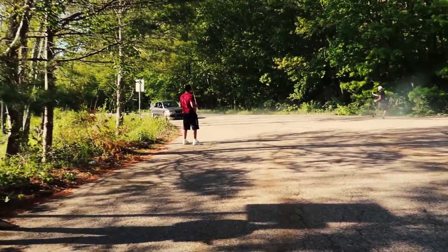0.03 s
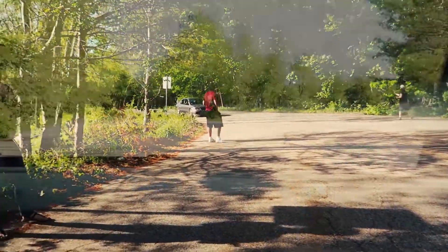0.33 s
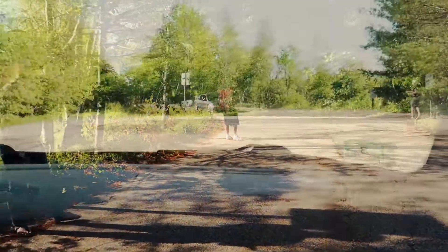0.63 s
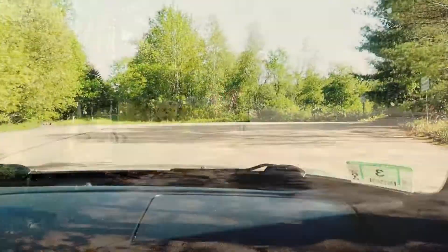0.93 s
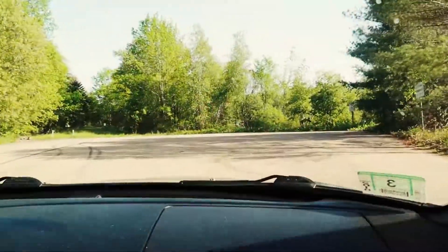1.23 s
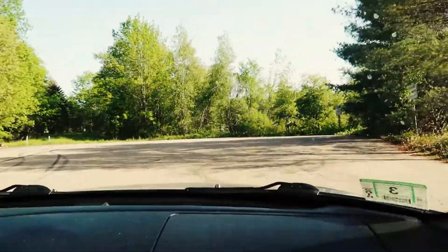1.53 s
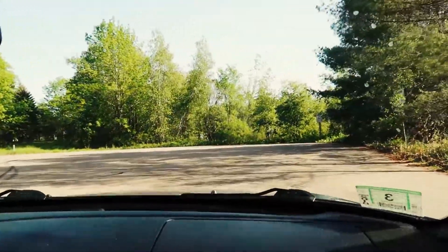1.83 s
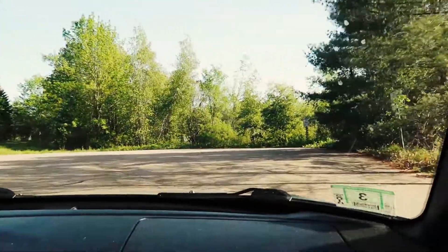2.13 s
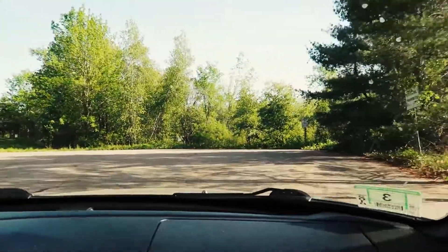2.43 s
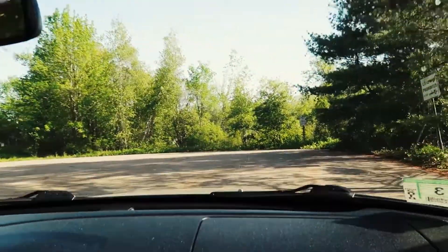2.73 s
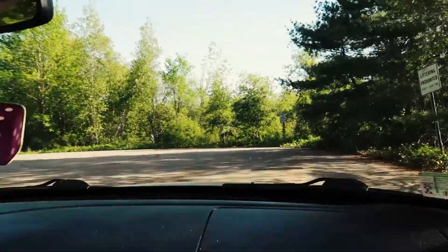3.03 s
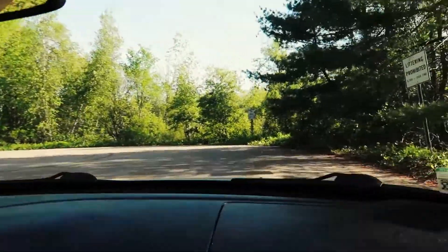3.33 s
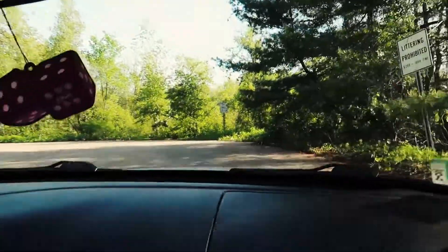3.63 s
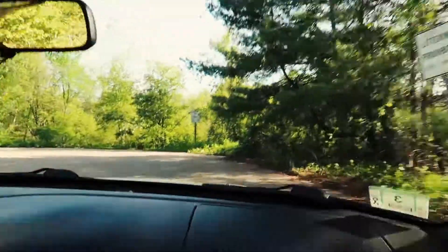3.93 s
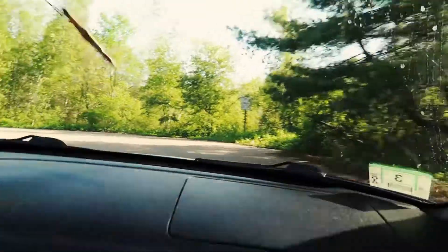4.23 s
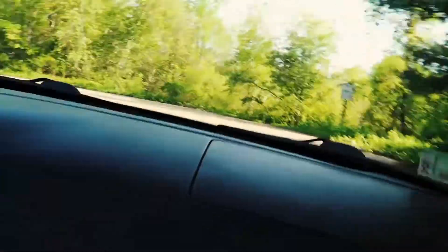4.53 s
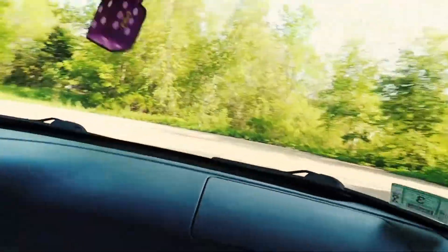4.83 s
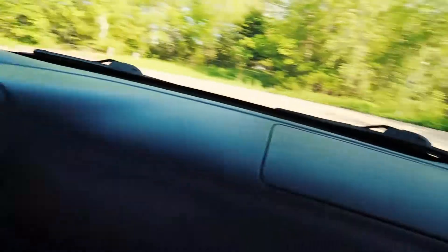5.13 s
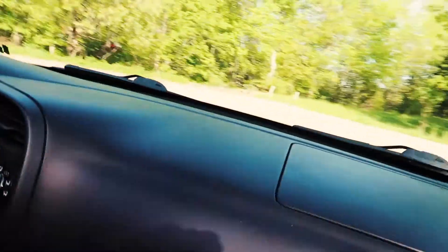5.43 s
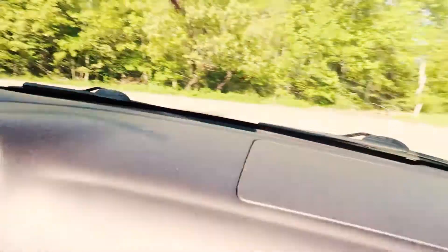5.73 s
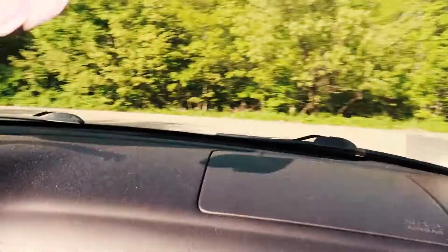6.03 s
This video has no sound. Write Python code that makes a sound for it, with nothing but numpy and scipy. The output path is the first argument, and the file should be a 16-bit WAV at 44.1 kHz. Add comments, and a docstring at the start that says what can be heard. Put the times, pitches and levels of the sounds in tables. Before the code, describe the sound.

Inside a car, the engine hums and climbs, then roars in bursts as the tyres chirp, spray grit and screech around a turn.

```python
"""A four-cylinder car rasps past the roadside for a moment as stones tick off its body.
An abrupt cut leads to the cabin: the steering pump whines, and the exhaust booms through the air modes
as the car gathers speed. Loose trim clicks and something knocks. The throttle opens, firing pulses
make the intake roar, a wheel chirps and hops, then the tyres spin up and spray grit. Last, the car
slides through a turn, its tyres squealing by stick-slip friction, while the driver pumps the throttle."""
import sys
import numpy as np
from scipy import signal
from scipy.fft import rfft, irfft, next_fast_len
from scipy.io import wavfile
from scipy.ndimage import uniform_filter1d, minimum_filter1d

SR = 44100
rng = np.random.default_rng(int(sys.argv[2]) if len(sys.argv) > 2 else 0)


def master_out(mix):
    """Clip the mix to full scale and print it as 16-bit PCM to the path in sys.argv[1]."""
    frames = np.transpose(np.atleast_2d(mix))
    ceiling = np.clip(frames, -1, 1)
    pcm = np.round(ceiling * 32767).astype(np.int16)
    wavfile.write(sys.argv[1], SR, pcm)


N = 267687
T = np.arange(N) / SR
CUT_S, LAUNCH_S, SLIDE_S = .195, 3.4, 5.2  # start of the cabin, of hard driving, of the free slide
OVERRUN_FROM_S = 4.4  # from here on, the boom drops whenever the pedal is up
PRESS_S, LIFT_S = .036, .029  # how fast the throttle opens and shuts

# the four cylinders: (strength [dB per dB of unevenness], delay [s per 2 dB of unevenness])
CYLINDERS = [(1.5, 0), (0.14, .00007), (-1.5, -.00005), (0.9, .00002)]
# response of the exhaust in the open: (frequency [Hz], relative gain [dB])
ROADSIDE_RESPONSE = [(40, -20), (110, -19), (157, 9.5), (220, -31), (320, -8), (450, -17.5), (620, 3),
                     (700, 1.5), (800, -3.5), (920, -3), (1100, -18.5), (2000, -26), (5000, -45)]
# rasp of the exhaust at the roadside: (time [s], level [dB])
ROADSIDE_LEVEL = [(0, -17.5), (.05, -23.5), (.09, -23), (.15, -27), (.195, -18)]
# hiss of tyres and engine in the open: (frequency [Hz], relative gain [dB])
HISS_SPECTRUM = [(200, 5), (900, 10), (1500, -3), (2800, -6.5), (5000, -25), (9000, -37)]
# stones striking the body: (time [s], peak level [dB], decay [s])
STONE_HITS = [(.013, -30, 0.006), (.039, -27, 0.0021), (.168, -42.5, 0.024), (3.727, -36.5, .002),
              (3.748, -36.5, 0.0027), (3.767, -36, .002), (3.788, -35.5, .002), (3.882, -45, 0.0017),
              (4.377, -39, 0.0015), (5.286, -37, .002)]
# response of the body to a stone: (frequency [Hz], relative gain [dB])
STONE_RESPONSE = [(600, -5.5), (1500, 5.5), (5000, -2), (8000, -14.5), (12000, -26)]
# a gentle pull, a flare, a bog as the tyres bite, wheelspin, a lift: (time [s], firing rate [Hz])
FIRING_RATE = [(.2, 38.5), (.3, 39.14), (.36, 46.03), (.57, 49.09), (.72, 52.57), (1.26, 60.69),
               (1.98, 73.86), (2.28, 78.15), (3.38, 89.15), (3.47, 98.95), (3.55, 115.3), (3.62, 139.4),
               (3.67, 147.8), (3.9, 119.5), (4.01, 113.4), (4.2, 136.6), (4.46, 146.1), (4.52, 157.5),
               (4.65, 200.9), (5.04, 202), (5.11, 177.6), (5.27, 165.8)]
# stabs of the throttle: (time [s], hold [s], intake level [dB], grit level [dB])
THROTTLE_STABS = [(3.494, 0.069, -16.5, -73.5), (3.86, 0.23, -22, -57), (4.236, 0.22, -27.5, -69.5),
                  (4.494, .525, -19, -26), (5.275, 0.11, -15, -34.5), (5.595, 0.15, -17, -39.5),
                  (5.933, .15, -16.5, -52)]
# exhaust harmonics 1 to 3, ahead of the cabin's response: (level [dB])
EXHAUST_HARMONICS = [1, -4.5, -11]
# air modes of the cabin: (frequency [Hz], gain [dB])
CABIN_MODES = [(39, -16.5), (46, -11), (49, -16.5), (53, -17), (65, -11.5), (79, -16.5), (88, -11),
               (100, -10.5), (120, -10.5), (138, -10.5), (157, -3.5), (168, -7.5), (176, -15), (184, -21),
               (203, -16), (220, -11.5), (240, -23), (270, -29.5)]
# the clutch loads or frees the engine: (time [s], hold [s], change of the boom [dB])
CLUTCH_LOADS = [(.16, 0.3, 5.5), (.5, 0.097, -3.5), (3.41, 0.16, 5.5)]
# intake through the bulkhead at middling revs: (frequency [Hz], relative gain [dB])
GROWL_RESPONSE = [(40, -24), (100, -9.5), (150, -9), (240, -1), (340, 1), (450, -1.5), (570, 2), (690, 3),
                  (800, -6), (930, -18.5), (1170, -11.5), (1450, -32), (2000, -27), (5000, -56.5)]
# the same at high revs: (frequency [Hz], relative gain [dB])
BLARE_RESPONSE = [(40, -39), (100, -15), (150, 6.5), (260, -25), (350, 1), (450, -1.5), (590, 2.5),
                  (730, 9), (820, 0.5), (930, -16.5), (1180, -8), (1400, -25), (1800, -22), (5000, -50.5)]
# resonances of the cabin panels: (frequency [Hz], relative gain [dB])
PANEL_RESPONSE = [(240, -21), (330, 0.5), (365, 17), (420, -3.5), (470, -11.5), (520, 7.5), (600, -4),
                  (650, 5.5), (720, -17), (800, 3.5), (900, -14.5), (1170, -17), (1700, -33), (4000, -35)]
# colour of the mechanical rush: (frequency [Hz], relative gain [dB])
RUSH_SPECTRUM = [(120, -15.5), (250, 0), (450, 4.5), (800, -4.5), (1050, -4.5), (1400, -7.5), (1700, -12),
                 (2200, -14.5), (3200, -23.5), (5000, -30.5), (8000, -38.5), (12000, -43.5)]
# strength of the mechanical rush: (time [s], level [dB])
RUSH_LEVEL = [(.2, -37), (.6, -43), (1.4, -38.5), (2.8, -39), (3.32, -35), (3.52, -39.5), (4.08, -34.5),
              (4.28, -37), (5.05, -30.5), (6.07, -47)]
# low rumble through the body: (frequency [Hz], relative gain [dB])
RUMBLE_RESPONSE = [(20, -29), (35, -16.5), (52, -2), (80, -8.5), (120, -7), (170, -9.5), (260, -20),
                   (450, -42)]
# swells of low rumble, first as the engine lugs, then as the body shakes:
# (peak time [s], level [dB], rise [s], decay [s])
RUMBLE_SWELLS = [(.2, -19.5, .01, 0.15), (3.4, -19.5, 0.73, .1), (4.7, -23.5, .15, 0.55),
                 (5.061, -18.5, 0.022, 0.062)]
# loose trim clicking: (time [s], peak level [dB], decay [s])
TRIM_HITS = [(2.529, -25.5, 0.0052), (2.543, -29, .003), (2.588, -23.5, 0.0036), (2.597, -32, 0.0053),
             (2.682, -29, 0.011), (3.538, -23.5, 0.0076), (3.548, -40, .004), (3.572, -36, .004)]
# response of the trim: (frequency [Hz], relative gain [dB])
TRIM_RESPONSE = [(300, -30.5), (800, 10.5), (1400, 9.5), (2200, -7), (3800, -17), (5000, -32), (9000, -34)]
# something loose knocking in the cabin: (time [s], peak level [dB], decay [s])
KNOCK_HITS = [(3.241, -16.5, 0.0083), (3.266, -19, 0.0087)]
# response to those knocks: (frequency [Hz], relative gain [dB])
KNOCK_RESPONSE = [(100, -19), (165, 18.5), (300, -4.5), (550, 0.5), (1300, -4), (2200, -34), (6000, -46.5)]
# grit against the wheel arches: (frequency [Hz], relative gain [dB])
GRIT_SPECTRUM = [(500, -16), (1200, 8), (1750, 0), (2100, 5.5), (3000, 0.5), (4000, -2), (5500, -4.5),
                 (6500, -9.5), (9000, -12), (11000, -11.5), (12500, -26)]
# tyre squeals: (time [s], hold [s], release [s], starting slip rate [Hz], glide [Hz/s],
# starting level [dB], growth [dB/s], overtone [dB], roughness [fraction of slip rate])
SQUEALS = [(3.67, .15, .08, 1031, -150, -31, -1, -13, .06),
           (4.599, 0.17, .15, 1145, 61.5, -32, -3, -28.5, .04),
           (4.621, 1.7, .05, 781, 25.5, -31, 3.5, -15, .035), (5.078, 1, .05, 1384, -49, -37, 9, -31, .035),
           (5.73, 0.12, 0.031, 852, 3, -27, -1, -29.5, .015)]
# rubber scrubbing sideways over asphalt: (frequency [Hz], relative gain [dB])
SCRUB_SPECTRUM = [(300, -10.5), (550, -12.5), (830, 3.5), (1050, -4.5), (1350, -6), (1580, -11.5),
                  (1780, -18), (2150, -11.5), (2900, -22.5), (4500, -38)]


def undb(db):
    """Decibels to amplitude ratio."""
    return 10 ** (np.asarray(db) / 20)


def curve(rows):
    """Linear interpolation of (time [s], value) rows."""
    return np.interp(T, *np.transpose(rows))


def unit(x):
    """Normalisation to rms 1."""
    return x / np.sqrt(np.mean(x ** 2))


def steady(x, size=SR // 16):
    """Normalisation of the running rms to 1."""
    return x / np.sqrt(uniform_filter1d(uniform_filter1d(x ** 2, size), size) + 1e-12)


def walk(rate_hz, size=16384):
    """Interpolated random fluctuation with a spread near 1."""
    return np.sqrt(3 / 2) * np.interp(T * rate_hz, np.arange(size), rng.standard_normal(size))


def until(end_s, fade_s):
    """Unity up to end_s, then exponential decay."""
    return np.exp(-(T - end_s).clip(0) / fade_s)


def envelope(start_s, held_s, attack_s, release_s):
    """Linear attack, then exponential decay from held_s after the start."""
    return np.clip((T - start_s) / attack_s, 0, 1) * until(start_s + held_s, release_s)


def with_revs(hz, db, db_per_octave):
    """Power law of gain against firing rate; db holds at 100 Hz."""
    return undb(db + db_per_octave * np.log2(hz / 100))


def pan(right_db):
    """A level difference between the channels places a source to the right."""
    return undb(np.array([[-1], [1]]) * right_db / 2)


def noise(spread):
    """Partly coherent stereo noise: a shared direct part plus unrelated reflections."""
    direct, *reflected = rng.standard_normal((3, N))
    return (direct + spread * np.array(reflected)) / np.hypot(1, spread)


def colour(x, response, size=8192):
    """Minimum-phase filtering: x rings a body of the given response and unit power gain."""
    hz, db = np.transpose(response)
    bins = np.maximum(np.arange(size // 2 + 1) * SR / size, 1)
    octaves_outside = np.log2(np.maximum(hz[0] / bins, bins / hz[-1]).clip(1))
    gain_db = np.interp(np.log(bins), np.log(hz), db) - 20 * octaves_outside
    cepstrum = irfft(np.log(undb(gain_db)))
    cepstrum[1:size // 2] *= 2  # folding the cepstrum makes the response causal
    cepstrum[size // 2 + 1:] = 0
    ring = irfft(np.exp(rfft(cepstrum)))
    return signal.oaconvolve(x, ring[None] / np.linalg.norm(ring), axes=1)[:, :N]


def firings(cycles, uneven_db, scatter_db, jitter_s):
    """A pulse train, one pulse a firing: unequal cylinders put sidebands between the harmonics."""
    count = np.arange(1, int(cycles[-1]))
    jitter, scatter = rng.standard_normal((N // 100, 2))[count].T
    strength, delay = np.take(CYLINDERS, count, axis=0, mode="wrap").T
    due_s = np.interp(count, cycles, T)
    spread_db = np.interp(due_s, T, uneven_db)
    at = (due_s + spread_db * delay / 2 + jitter_s * jitter).clip(0, T[-3]) * SR
    size = undb(spread_db * strength + scatter_db * scatter)
    i = at.astype(int)  # each pulse is shared between two samples
    return (np.bincount(i, size * (1 - at + i), N) + np.bincount(i + 1, size * (at - i), N))[None]


def gas(cycles):
    """Turbulent flow noise, strongest just after each firing."""
    return unit(rng.standard_normal(N) * np.exp(-(cycles % 1) / .35))


def roadside(firing_hz=154.2, hiss_db=-38):
    """Source and filter: uneven pulses and turbulence excite the exhaust, over hiss in the open air."""
    cycles = firing_hz * T + .8
    pulses = firings(cycles, uneven_db=np.full(N, 4.5), scatter_db=1, jitter_s=.00005)
    drive = unit(pulses) + .35 * gas(cycles)
    rasp = steady(colour(drive, ROADSIDE_RESPONSE)) * undb(curve(ROADSIDE_LEVEL))
    return rasp + colour(noise(spread=.099), HISS_SPECTRUM) * undb(hiss_db)


def impacts(hits, response):
    """Impact excitation: short rattling contacts ring a damped body."""
    force = sum(undb(db) * (T >= s) * until(s, decay) for s, db, decay in hits)
    return colour(noise(spread=.18) * force, response)


def exhaust(cycles, hz, pedal, pedal_db=.5, overrun_db=-4):
    """Cavity resonance: low harmonics swell and sink as they glide through the cabin's air modes."""
    mode_hz, mode_db = np.transpose(CABIN_MODES)
    overtone_db = np.interp(hz, [85, 110], [0, -14])  # at speed the fundamental dominates
    boom = 0
    for k, db in enumerate(EXHAUST_HARMONICS, 1):
        level_db = db + np.interp(k * hz, mode_hz, mode_db) + (k > 1) * overtone_db
        boom += undb(level_db) * np.cos(2 * np.pi * k * cycles)
    load_db = sum(db * envelope(s, held, PRESS_S, LIFT_S) for s, held, db in CLUTCH_LOADS)
    coasting = (1 - pedal) * (1 - until(OVERRUN_FROM_S, LIFT_S))
    return boom * undb(load_db + pedal_db * pedal + overrun_db * coasting + .5 * walk(35))


def intake(cycles, hz, pedal, middling_hz=118, high_hz=168, limit_hz=202, shut_db=-1.5, open_db=-10):
    """Forced vibration: pulses and turbulence ring the intake; the pulses also buzz the panels."""
    uneven_db = np.interp(hz, [high_hz, limit_hz], [1, 1.8])  # lumpy at the rev limit
    pulses = steady(firings(cycles, uneven_db, scatter_db=.7, jitter_s=.00003))
    turbulence = undb(shut_db + (open_db - shut_db) * pedal) * gas(cycles)
    drive = pulses + turbulence
    sharp = np.interp(hz, [middling_hz, high_hz], [0, 1])  # high revs reach the higher resonances
    ring = (1 - sharp) * colour(drive, GROWL_RESPONSE) + sharp * colour(drive, BLARE_RESPONSE)
    buzz_gain = with_revs(hz, db=-36, db_per_octave=15) * until(LAUNCH_S, fade_s=.07)
    return steady(reflections(ring)) * intake_gain(hz) + colour(pulses, PANEL_RESPONSE) * buzz_gain


def reflections(x, t60_s=.074, wet_db=-11):
    """Interference with reflections from glass and trim makes gliding harmonics swell and dip."""
    t = T[:SR // 8]
    tail = rng.standard_normal(len(t)) * undb(-60 * t / t60_s) * (t > .002)
    return x + undb(wet_db) * signal.oaconvolve(x, tail[None] / np.linalg.norm(tail), axes=1)[:, :N]


def intake_gain(hz, gentle_db=-14):
    """Throttling sets the roar: faint at first, half open from the launch on, full at each stab."""
    launched = np.clip((T - LAUNCH_S) / PRESS_S, 0, 1)
    half_open = with_revs(hz, db=-31.5, db_per_octave=8.5) * undb(gentle_db * (1 - launched))
    stabs = sum(undb(db) * envelope(s, held, PRESS_S, LIFT_S) for s, held, db, _ in THROTTLE_STABS)
    return np.hypot(half_open, stabs)


def mechanical_rush(cycles):
    """Amplitude modulation: the noise of valve gear, fan and rolling tyres throbs with the firings."""
    throb = unit(1 + .035 * np.cos(2 * np.pi * cycles))
    flutter = undb(.5 * walk(15))
    return colour(noise(spread=.31) * throb * flutter, RUSH_SPECTRUM) * undb(curve(RUSH_LEVEL))


def body_rumble(rolling_db=-28, launched_db=-33):
    """Structure-borne noise: steady rolling, lighter after the launch, adds in power to the swells."""
    rolling = undb(launched_db + (rolling_db - launched_db) * until(LAUNCH_S, fade_s=.15))
    swells = sum(undb(db) * envelope(s - rise, rise, rise, fall) for s, db, rise, fall in RUMBLE_SWELLS)
    return colour(noise(spread=.065), RUMBLE_RESPONSE) * np.hypot(rolling, swells)


def tone(pitch_hz, wander):
    """A sinusoidal vibration, randomly modulated in frequency and amplitude."""
    hz = pitch_hz * (1 + wander * walk(30))
    flicker = undb(2.5 * walk(22))
    return np.sqrt(2) * np.sin(2 * np.pi * np.cumsum(hz) / SR) * flicker


def steering_pump(turned_db=-46, straight_db=-57):
    """Tonal machine noise: the pump whines while the wheel is turned, then lingers faintly."""
    turned = undb(turned_db) * envelope(CUT_S, held_s=.18, attack_s=.11, release_s=.076)
    straight = undb(straight_db) * until(end_s=2, fade_s=.15)
    return tone(pitch_hz=1388, wander=.008) * (turned + straight)


def grit(spin_up_s=.11, build_s=.024, settle_s=.047, growth_db_per_s=9):
    """Random impacts merge into noise: after each stab the wheels spin up and fling sand at the arches."""
    spray = 0
    for s, held, _, db in THROTTLE_STABS:
        spin = np.exp(-(s + spin_up_s - T).clip(0) / build_s) * until(s + held, settle_s)
        spray += spin * undb(db - growth_db_per_s * (s + held - T).clip(0))
    grains = unit(undb(1.2 * walk(900)))
    return colour(noise(spread=.55) * grains, GRIT_SPECTRUM) * spray * pan(right_db=.5)


def squeal(slip_hz, roughness, overtone_db, wander=.042, ribs=4):
    """Stick-slip oscillation: each tread rib sings in fits, at its own unsteady rate."""
    song = 0
    for _ in range(ribs):
        hz = slip_hz * (1 + wander * walk(30) + roughness * walk(500))
        phase = 2 * np.pi * np.cumsum(hz) / SR
        fits = undb(2.5 * walk(45))
        song += fits * (np.sin(phase) + undb(overtone_db) * np.sin(2 * phase))
    return unit(song)


def skid(spin, attack_s=.037, slip_rise=.07, scrub_s=4.6, scrub_db=-32.5, scrub_db_per_s=2):
    """Sliding friction: a chirp at the launch, then scrub and squeals whose pitch rises with wheelspin."""
    sliding_s = (T - scrub_s).clip(0)
    scrub_gain = (sliding_s / attack_s).clip(0, 1) * undb(scrub_db + scrub_db_per_s * sliding_s)
    rubber = colour(noise(spread=.36), SCRUB_SPECTRUM) * scrub_gain
    for s, held, release, hz, glide, db, growth, overtone_db, roughness in SQUEALS:
        age = (T - s).clip(0, held + 2 * release)
        slip_hz = (hz + glide * age) * (1 + slip_rise * spin)
        gain = envelope(s, held, attack_s, release) * undb(db + growth * age)
        rubber += squeal(slip_hz, roughness, overtone_db) * gain
    return rubber * pan(right_db=2.5)


def wheel_hop(level_db=-21):
    """Self-excited vibration: the driven axle bounces as grip comes and goes at the launch."""
    bout = envelope(start_s=3.68, held_s=.24, attack_s=.051, release_s=.05)
    return tone(pitch_hz=51.5, wander=.1) * bout * undb(level_db)


def stumbles(dip_db=-5.5, width_s=.019, lead_s=.0094):
    """Throttle transients: in the slide the engine's level dips just before each stab catches."""
    dips = sum(np.exp(-((T - s + lead_s) / width_s) ** 2) for s, *_ in THROTTLE_STABS if s > SLIDE_S)
    return undb(dip_db * dips)


def wheelspin(lag_s=.04, fall_s=.16):
    """Rotational inertia: in the slide each stab spins the wheels up towards 1, then they sag to 0."""
    spin = np.zeros(N)
    for s, held, *_ in THROTTLE_STABS:
        if s > SLIDE_S:
            rise_s = held + lag_s
            rise = np.sin(np.pi / 2 * np.clip((T - s) / rise_s, 0, 1))
            spin += rise * np.clip(1 - (T - s - rise_s) / fall_s, 0, 1)
    return spin


def scene(spin_rise_hz=18, bite_db=4, spin_db=-3.5):
    """Superposition of the sources: the roadside first, then the cabin, led by pedal and revs."""
    pedal = sum(envelope(s, held, PRESS_S, LIFT_S) for s, held, *_ in THROTTLE_STABS)
    spin = wheelspin()
    firing_hz = curve(FIRING_RATE) + spin_rise_hz * spin
    cycles = np.cumsum(firing_hz) / SR
    # in the slide the boom swells as a stab bites and sinks as the wheels spin free
    boom = exhaust(cycles, firing_hz, pedal) * undb(bite_db * pedal * (T > SLIDE_S) + spin_db * spin)
    roar = intake(cycles, firing_hz, pedal)
    engine = (boom + roar) * stumbles() + mechanical_rush(cycles) + steering_pump()
    chassis = body_rumble() + grit() + wheel_hop() + skid(spin)
    cabin = engine + chassis + impacts(TRIM_HITS, TRIM_RESPONSE) + impacts(KNOCK_HITS, KNOCK_RESPONSE)
    inside = np.clip((T - CUT_S - .004) / .004, 0, 1)  # a 4 ms gap, then a 4 ms rise
    return (T < CUT_S) * roadside() + inside * cabin + impacts(STONE_HITS, STONE_RESPONSE)


def record(dry, left_lag_s=.000037, ceiling=.68, top_hz=12000):
    """A path difference delays the left channel; a limiter holds the peaks; a low-pass cuts the top."""
    size = next_fast_len(N + 1024, real=True)
    delay = np.exp(-2j * np.pi * np.fft.rfftfreq(size, 1 / SR) * left_lag_s)
    left = irfft(rfft(dry[0], size) * delay, size)[:N]
    stereo = np.array([left, dry[1]])
    headroom = ceiling / np.maximum(np.abs(stereo).max(axis=0), ceiling)
    gain = uniform_filter1d(minimum_filter1d(headroom, size=1024), size=1024)
    lowpass = signal.ellip(8, .2, 70, top_hz, fs=SR, output="sos")
    return signal.sosfilt(lowpass, stereo * gain)


dry = scene()
out = record(dry)
master_out(out)
```